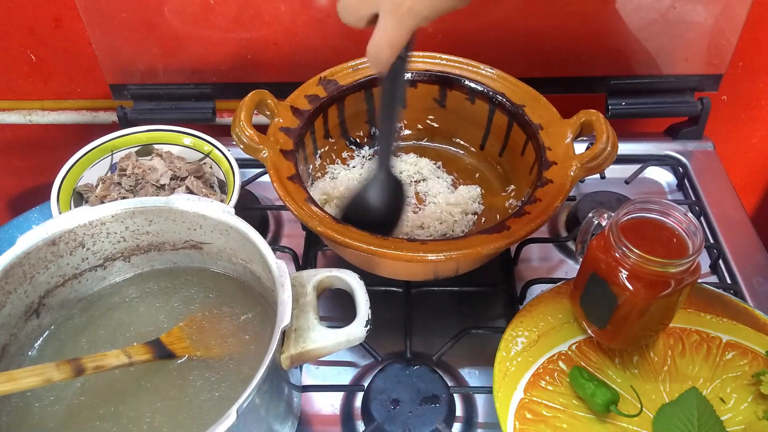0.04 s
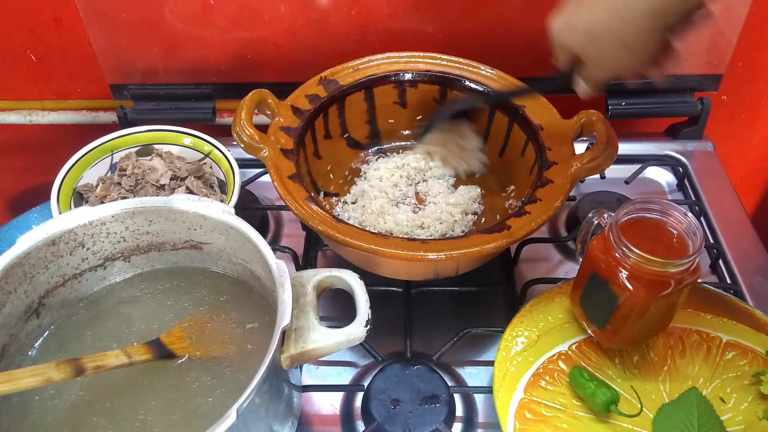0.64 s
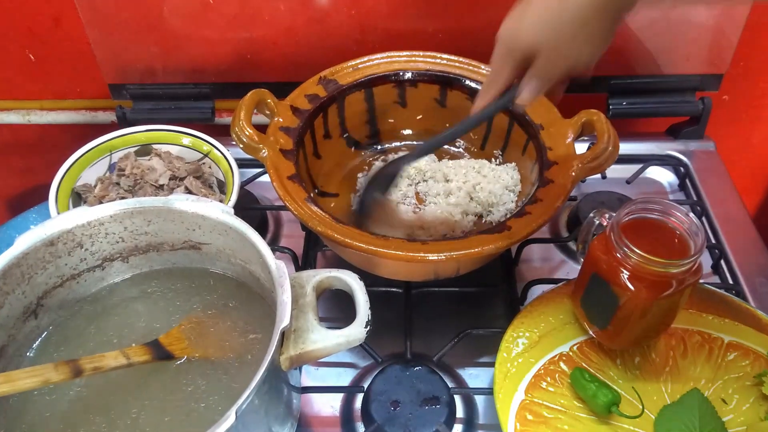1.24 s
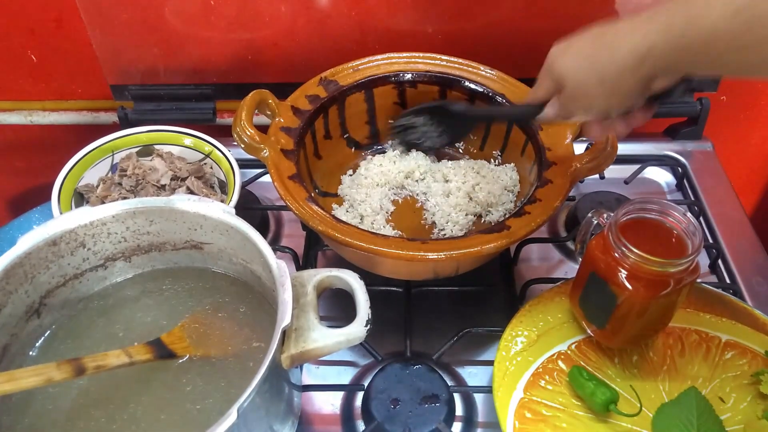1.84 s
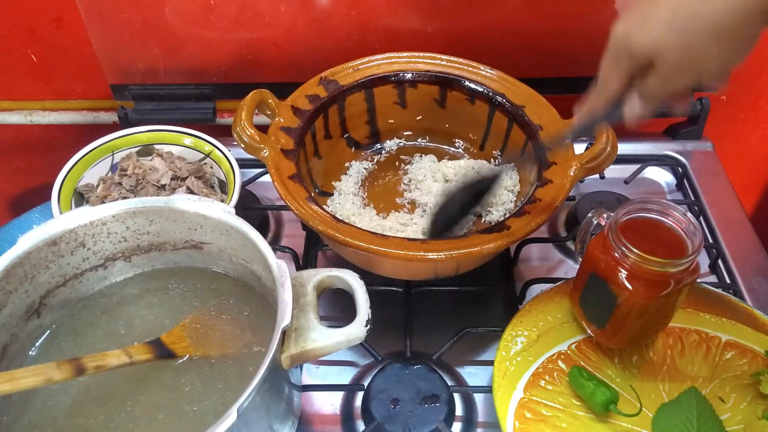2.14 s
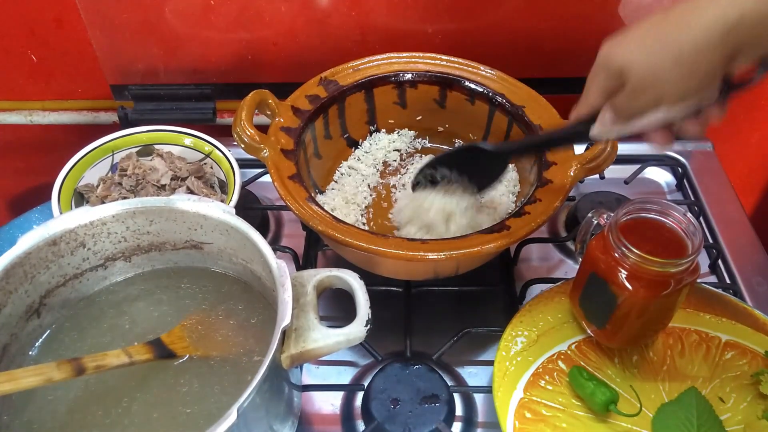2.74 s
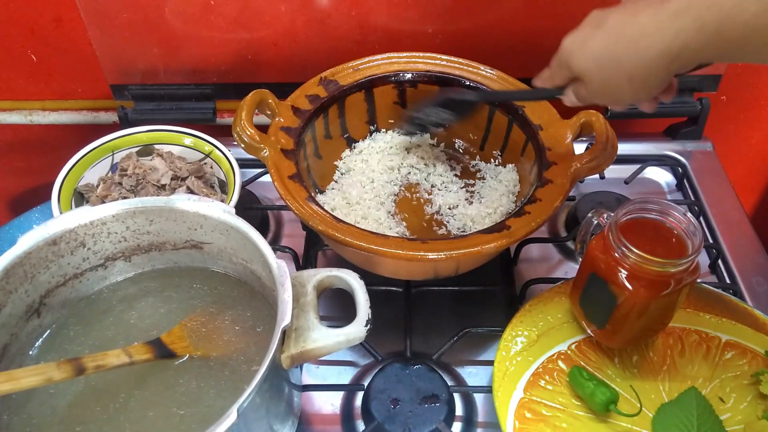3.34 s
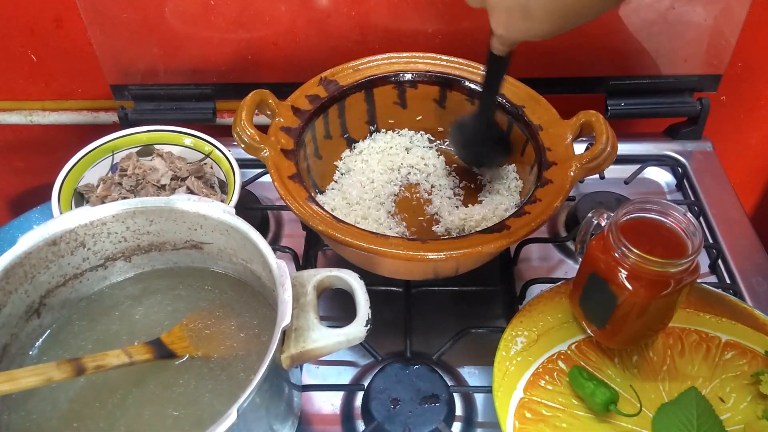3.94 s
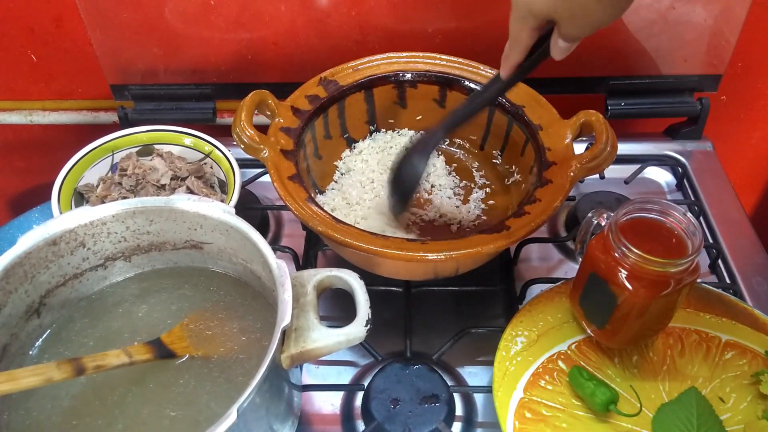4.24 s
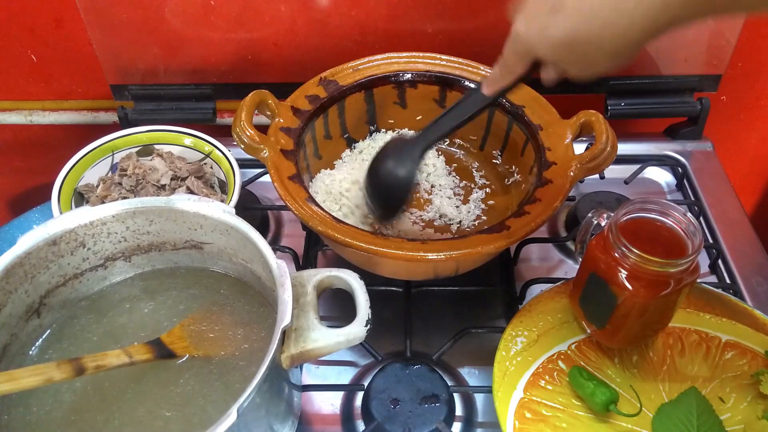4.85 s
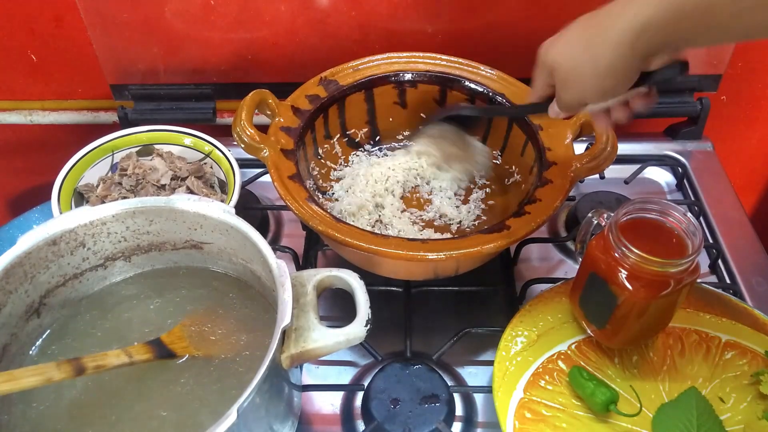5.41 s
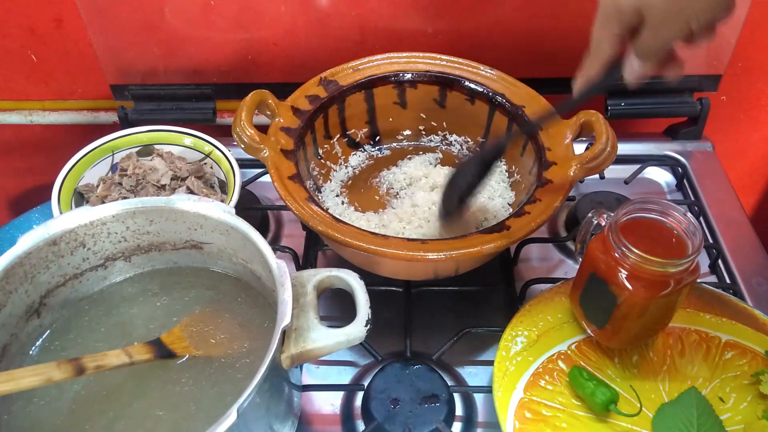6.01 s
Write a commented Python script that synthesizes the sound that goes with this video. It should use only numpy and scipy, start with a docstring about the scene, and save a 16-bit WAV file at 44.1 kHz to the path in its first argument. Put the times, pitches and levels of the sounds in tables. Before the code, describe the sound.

Gritty, irregular scraping runs throughout as dry rice is pushed around a clay pot with a plastic spoon. Dull bumps and sharper, briefly ringing knocks punctuate the hiss of sliding rice and the patter of flicked grains. A few faint squeaks come in the second half. A nearby microphone picks it up in a small kitchen, with a low background rumble and soft handling thumps, mostly at the start.

```python
"""A plastic spoon knocks and scrapes around a glazed clay pot, stirring dry rice in uneven strokes.
Hard knocks set the clay ringing and jolt the rice; where rice cushions the spoon, they are dull bumps.
Grains catch and slip under the spoon, the heap slides with a fine hiss, flicked grains patter on the
glaze and the dragged edge squeals faintly. A phone hears it through two close ports, with a short
kitchen echo, a low background rumble and a few handling thumps."""
import sys
import numpy as np
from scipy import signal
from scipy.fft import rfft, irfft
from scipy.io import wavfile
from scipy.ndimage import map_coordinates

SR = 44100
rng = np.random.default_rng(int(sys.argv[2]) if len(sys.argv) > 2 else 0)


def generate_wav(sig):
    """Save sig (samples, or channels by samples) to the path in sys.argv[1] as 16-bit PCM at SR."""
    pcm = np.round(np.clip(np.atleast_2d(sig).T, -1, 1) * 32767).astype(np.int16)
    wavfile.write(sys.argv[1], SR, pcm)


N = 267891
T = np.arange(N) / SR

# Tone of the kitchen background. Each row: frequency in Hz, gain in dB.
KITCHEN_EQ = [(25, -22.5), (50, -9), (80, 2), (130, 5), (250, 0.5), (600, -9.5), (1200, -30), (3000, -83),
              (15000, -51)]
# Fader ride of that background. Each row: time in seconds, level in dB.
KITCHEN_RIDE = [(0, -42), (0.85, -45), (0.98, -56), (1.4, -48.5), (1.85, -45.5), (2.25, -47), (2.65, -47),
                (3.0, -52.5), (3.6, -53.5), (4.3, -47.5), (4.7, -46), (5.55, -42.5), (5.66, -57.5),
                (6.07, -59.5)]
# Handling thumps. Each row: centre in seconds, relative level in dB.
THUMPS = [(0.038, -29), (0.091, -24.5), (0.163, -33.5), (0.25, -24.5), (0.293, -26.5), (0.358, -40),
          (0.433, -35), (0.478, -31.5), (0.508, -32), (0.687, -42), (0.807, -41), (2.677, -23.5),
          (4.909, -29.5), (4.946, -24), (5.091, -34), (5.179, -41)]
# Tone of the rumble around a thump. Each row: frequency in Hz, gain in dB.
RUMBLE_EQ = [(50, -31), (80, 6.5), (130, -6), (200, 7), (350, -10), (900, -53)]
# Squeals. Each row: start, crest and end in seconds, first and last pitch in Hz, level in dB.
SQUEALS = [(3.71, 3.81, 3.87, 1080, 1005, -54), (4.14, 4.28, 4.5, 1113, 1110, -45),
           (4.58, 4.73, 4.92, 1365, 1340, -44)]
# Single grains hitting the glaze. Each row: start in seconds, level in dB.
TICKS = [(1.424, -53), (1.6615, -40), (1.698, -47), (2.506, -45), (2.827, -46), (3.6448, -50), (3.702, -53)]
# Spurts of flicked rice. Each row: start in seconds, relative level in dB.
SPURTS = [(1.698, -34), (1.888, -21), (2.401, -19.5), (2.767, -34), (2.868, -33), (3.263, -39),
          (3.516, -30), (3.645, -39), (5.52, -29), (5.575, -27)]
# The spoon's edge catching on a grain. Each row: start in seconds, level in dB.
CATCHES = [(0.05, -38), (0.246, -39), (0.308, -38), (0.424, -33), (0.487, -33), (0.521, -33), (0.585, -34),
           (0.607, -33), (0.632, -34), (0.985, -44), (1.094, -44), (1.839, -39), (2.219, -33), (2.262, -37),
           (4.008, -35), (4.066, -36), (4.59, -40), (4.65, -39), (5.385, -42), (5.719, -44)]
# Tone of sliding rice. Each row: frequency in Hz, gain in dB.
SLIDE_EQ = [(3000, -8), (5500, 0), (7300, 4), (8300, 4.5), (10000, 4.5), (13000, 3.5), (15500, 0)]
# Tone of grains ground on clay. Each row: frequency in Hz, gain in dB.
GRIND_EQ = [(200, 3), (330, 5.5), (440, 8), (620, 4), (850, -1), (1300, 10.5), (1650, 10.5), (2350, 4.5),
            (3200, 9.5), (4150, 7.5), (5200, 4.5), (7300, 1), (10000, 4.5), (15000, -2)]
# Treble roll-off of the grinding. Each row: frequency in Hz, gain in dB.
GRIND_ROLLOFF = [(6500, -4.5), (9000, -14.5)]
# Stirring strokes. Each row: time of full push, rise and hold in seconds, then relative levels in dB
# of the four stirring layers: pot body, clatter, grinding, sliding rice.
STROKES = [(0.065, 0.12, 0.0078, -43.5, -36, -32, -44), (0.239, 0.1, 0.21, -41.5, -36.5, -35, -39.5),
           (0.515, 0.23, 0.14, -38.5, -32.5, -29.5, -39.5), (0.697, 0.11, 0.012, -32.5, -30, -31.5, -37.5),
           (1.096, 0.22, 0.15, -44, -46.5, -51, -51.5), (1.287, 0.111, 0.11, -52.5, -79, -58, -53),
           (1.498, 0.037, 0.08, -40, -43.5, -40, -41.5), (1.71, 0.016, 0.0088, -35, -44.5, -50, -53),
           (1.893, 0.052, 0.0047, -34, -32.5, -31.5, -34), (2.037, 0.067, 0.027, -56.5, -61, -48.5, -40.5),
           (2.205, 0.048, 0.11, -37, -35, -33.5, -37), (2.648, 0.05, 0.025, -44, -41.5, -37.5, -42),
           (2.854, 0.093, 0.0081, -64, -60.5, -52.5, -45.5), (3.05, 0.073, 0.099, -42, -44.5, -45.5, -46.5),
           (3.185, 0.081, 0.071, -47.5, -52.5, -63, -52), (3.504, 0.098, 0.0055, -38.5, -36, -36, -46),
           (3.673, 0.083, 0.11, -66, -68, -65, -61.5), (4.01, 0.076, 0.16, -41.5, -34.5, -30.5, -40),
           (4.217, 0.13, 0.24, -51.5, -58, -56, -68), (4.537, 0.098, 0.14, -35.5, -39.5, -35.5, -37),
           (4.768, 0.072, 0.14, -40.5, -50, -50.5, -53), (5.13, 0.2, 0.13, -42, -39, -35.5, -39.5),
           (5.297, 0.16, 0.18, -43, -41, -38, -39), (5.736, 0.094, 0.068, -44.5, -44, -44.5, -47),
           (5.938, 0.16, 0.15, -62.5, -68, -58.5, -50.5)]
# Release of those four layers after a stroke, in dB per second.
RELEASE_RATES = [132, 200, 178, 104]
# Jolt given to those four layers, in dB relative to a knock's body, clack, edge and snap.
JOLT_DB = [-3.5, 2, 0.5, -5]
# Resonances of pot and spoon. Each row: frequency in Hz, level on contact in dB, decay time
# multiplier, level in the free ring in dB.
MODES = [(296, -16, 1.3, -14), (562.5, 1.5, 2, -13.5), (628.5, 10, 0.51, -25), (683.7, 11.5, 0.6, -22),
         (728.7, 4, 1.73, -13.5), (785, 0, 1.07, -33), (953.3, 5.5, 1.4, 2.5), (1062, -2.5, 0.75, -30),
         (1226, 3.5, 1.1, -20), (1483, 0, 1.4, -3), (1538, -4, 1.6, -30), (1633, -1, 1.23, -4.5),
         (1850, -4.5, 1.5, -23), (2003, 9, 0.38, -16), (2520, 2, 0.4, -14), (2865, -8.5, 1, -13.5),
         (3200, -16, 1.0, -15), (4065, 4, 0.34, -11), (4520, -10, 0.5, -4)]
# Bands for thud, body, clack, edge and snap. Each row: low and high cutoff in Hz.
BANDS = [(255, 400), (490, 1050), (1050, 2300), (2300, 5200), (5200, 15500)]
THUD, BODY, CLACK, EDGE, SNAP = range(5)
# Cushioned bumps. Each row: start in seconds, most excited frequency in Hz, relative level in dB.
BUMPS = [(0.197, 750, -35.5), (0.433, 640, -28), (0.592, 537, -32), (0.708, 950, -32), (0.749, 652, -35.5),
         (1.109, 750, -35), (1.203, 659, -34.5), (1.32, 656, -39.5), (1.582, 650, -32.5), (1.654, 835, -35),
         (1.71, 668, -29.5), (1.784, 675, -32), (1.946, 687, -32), (2.132, 620, -39.5), (2.31, 660, -28.5),
         (2.51, 640, -33.5), (2.683, 614, -28.5), (3.056, 638, -34), (3.094, 612, -33.5),
         (3.162, 637, -36.5), (3.359, 640, -39.5), (3.482, 774, -29.5), (3.62, 623, -41.5),
         (4.065, 868, -31), (4.196, 620, -31.5), (5.098, 853, -32.5), (5.56, 591, -37.5), (5.92, 650, -44)]
# Hard knocks. Each row: start in seconds, most excited frequency in Hz, base decay time in seconds,
# levels of body, clack, edge, snap, hum and ping in dB, length of the free ring in seconds.
KNOCKS = [(0.419, 1780, 0.15, -39, -33, -31, -42, -52, -46, 0.02),
          (0.518, 1910, 0.2, -55, -43, -29, -40, -45, -44, 0.02),
          (0.898, 730, 0.081, -25.5, -38, -34, -33, -18.5, -29.5, 0.036),
          (1.476, 556, 0.15, -34, -40, -37, -59, -54, -46, 0.02),
          (1.846, 592, 0.23, -24.5, -33, -28, -52, -38, -34, 0.012),
          (2.203, 1350, 0.21, -37.5, -35, -60, -47, -60, -50, 0.02),
          (2.544, 617, 0.4, -31, -41, -33.5, -35, -41, -40, 0.025),
          (2.573, 673, 0.14, -25, -31, -31.5, -41, -31, -46, 0.017),
          (2.665, 566, 0.16, -35.5, -62, -28.5, -44, -56, -48, 0.0194),
          (2.9895, 1600, 0.076, -32, -20, -24.5, -44, -43, -26, 0.03),
          (3.392, 583, 0.48, -37.5, -37, -33, -44, -45, -37, 0.022),
          (3.8544, 1650, 0.11, -25.5, -21.5, -28.5, -44, -21, -41, 0.014),
          (4.133, 670, 0.12, -44, -41.5, -32, -54, -42, -48, 0.02),
          (4.458, 1016, 0.066, -22, -23.5, -45.5, -44.5, -24, -27, 0.021),
          (4.469, 634, 0.2, -23.5, -54, -41.5, -45, -36, -49, 0.02),
          (4.982, 680, 0.1, -20, -39, -28, -36.5, -22, -50, 0.026),
          (5.042, 734, 0.077, -43, -64, -30.5, -61, -50, -54, 0.02),
          (5.3969, 520, 0.048, -22, -31.5, -44, -59, -38, -34, 0.029),
          (5.5968, 680, 0.11, -27.5, -37, -32, -34, -27.5, -30, 0.041)]
# Weight of a knock's thud. Each row: most excited frequency in Hz, level against the body in dB.
THUD_WEIGHT = [(500, -2.5), (600, -9), (700, -30.5), (1000, -19), (1600, -28)]
# Tone of a knock's snap. Each row: frequency in Hz, gain in dB.
SNAP_EQ = [(5200, 3), (8500, 1.5), (12000, 0), (15000, 0)]
# Stereo width of the ports. Each row: frequency in Hz, side over mid in dB.
PORT_WIDTH = [(100, -5), (170, -5), (300, -12), (600, -14), (900, -2), (1300, 4), (2000, -1), (4000, -1),
              (8000, 0)]
# Balance of the ports. Each row: frequency in Hz, left over right in dB.
PORT_BALANCE = [(100, -6.5), (300, -2.5), (1500, -2.5), (2500, 0), (3200, 0.5), (4200, -1.5), (8000, -2),
                (14000, -3.5)]
# Phase lead of the left port. Each row: frequency in Hz, lead in radians.
PORT_LEAD = [(150, 0), (350, .35), (700, .3), (1100, 0)]


def undb(db):
    """Decibels to gain."""
    return 10 ** (np.asarray(db) / 20)


def unit(x):
    """Scale to rms 1."""
    return x / np.sqrt(np.mean(x ** 2) + 1e-20)


def at_hz(points, hz):
    """Read (Hz, value) points on a log-frequency axis."""
    f, value = np.transpose(points)
    return np.interp(np.log(hz + 1), np.log(f), value)


def eq(x, curve):
    """Shape x with a curve of (Hz, dB) points."""
    size = x.shape[-1]
    gain = undb(at_hz(curve, np.fft.rfftfreq(2 * size, 1 / SR)))
    return irfft(rfft(x, 2 * size) * gain)[..., :size]


def band(x, index):
    """Band-pass x to one of the five bands."""
    return signal.sosfilt(signal.butter(4, BANDS[index], "band", fs=SR, output="sos"), x)


def hit_band(x, index, db):
    """One band of a hit, set to db over its first 30 ms."""
    x = band(x, index)
    return x * undb(db) / np.sqrt(np.mean(x[:, :SR * 3 // 100] ** 2, axis=1, keepdims=True))


def fade(t, t60):
    """Exponential decay, 60 dB down after t60 seconds."""
    return np.exp(-np.log(1000) * t / max(t60, 1e-3))


def attack(rise_s, size):
    """A rounded onset."""
    return 1 - np.exp(-T[:size] / rise_s)


def burst(t60, size):
    """Two unrelated decaying noises, for mid and side."""
    return rng.standard_normal((2, size)) * fade(T[:size], t60)


def ring(hz, t60, size):
    """One decaying resonance, with mid and side a quarter cycle apart."""
    phase = 2 * np.pi * hz * T[:size] + np.array([[0], [np.pi / 2]])
    return np.sin(phase) * fade(T[:size], t60) * attack(0.00008, size)


def convolve(x, response):
    """Play x through an impulse response."""
    return signal.fftconvolve(np.atleast_2d(x), response, axes=1)[:, :N]


def add(out, s, x):
    """Mix x in at s seconds."""
    i = int(s * SR)
    x = x[..., max(-i, 0):N - i]
    out[:, max(i, 0):max(i, 0) + x.shape[-1]] += x


def walk(rate):
    """Random wander at rms 1, with rate new targets a second."""
    points = rng.standard_normal(int(N / SR * rate) + 2)
    return unit(np.interp(T * rate, np.arange(len(points)), points))


def grains(rate, spread_db):
    """Random tiny impacts: many weak ones, a few strong."""
    hits = rng.random(N) < rate / SR
    strength = np.minimum(rng.exponential(size=N), 4)
    return hits * undb(spread_db * strength) * rng.choice([-1, 1], N)


def room(x, wet_db, t60=0.41, size=22050):
    """A small hard kitchen: the echo builds up within milliseconds and dies quickly."""
    build_up = 1 - np.exp(-(T[:size] / 0.01) ** 2)
    tail = eq(burst(t60, size) * build_up, [(150, 1.6), (600, -0.95), (4000, 0.71), (14000, 0.79)])
    return x + undb(wet_db) * convolve(x, unit(tail) / np.sqrt(size))


def phone_ports(mid_side, lag_s=1 / 2480):
    """Two spaced ports give left and right; mid and side take turns along the spectrum."""
    hz = np.fft.rfftfreq(N, 1 / SR)
    comb = np.exp(-(hz / 13000) ** 3) * (.04 + .955 * np.cos(2 * np.pi * hz * lag_s))
    side_ratio = (1 + comb) / (1 - comb) * undb(at_hz(PORT_WIDTH, hz)) ** 2
    power_share = np.array([np.ones_like(hz), side_ratio]) / (1 + side_ratio)
    mid, side = rfft(mid_side) * np.sqrt(power_share)
    lean = undb(at_hz(PORT_BALANCE, hz) / 2) * np.exp(1j * at_hz(PORT_LEAD, hz) / 2)
    return irfft(np.array([(mid + side) * lean, (mid - side) / lean]), N)


def kitchen_tone():
    """A low, fluttering bed of rumble."""
    rumble = unit(eq(rng.standard_normal((2, N)), KITCHEN_EQ))
    return rumble * undb(np.interp(T, *np.transpose(KITCHEN_RIDE)) + 2 * walk(27))


def handling(thump_hz=124, width_s=0.0037, rumble_s=0.014, size=8820):
    """Dull thumps of a cycle or two in a loose rumble; they push the two ports in opposite senses."""
    out = np.zeros((2, N))
    t = T[:size] - T[size // 2]
    for s, db in THUMPS:
        rumble = unit(eq(rng.standard_normal(size), RUMBLE_EQ)) * np.exp(-np.abs(t) / rumble_s)
        phase = 2 * np.pi * thump_hz * t + rng.uniform(0, 2 * np.pi)
        thump = np.cos(phase) * np.exp(-np.abs(t / width_s) ** 1.4)
        add(out[1:], s + t[0], undb(db) * (thump + undb(-10.5) * rumble))  # side only
    return undb(16) * signal.sosfilt(signal.butter(6, 62, "high", fs=SR, output="sos"), out)


def squeals(fade_s=0.026):
    """The dragged spoon's edge sticks and slips fast enough to sing a faint, unsteady tone."""
    out = np.zeros((2, N))
    for start, crest, end, first_hz, last_hz, db in SQUEALS:
        glide = np.interp(T, [start, end], [first_hz, last_hz])
        hz = glide * (1 + 0.00408 * walk(40) + 0.01 * walk(400))
        arch_db = np.interp(T, [start, crest, end], [-8, 0, -8])
        gate = np.clip(np.minimum(T - start, end - T) / fade_s, 0, 1)
        swell = gate * undb(db + arch_db + 2.7 * walk(27.4) + 1.5 * walk(160))
        out[0] += np.sqrt(2) * swell * np.sin(2 * np.pi * np.cumsum(hz) / SR)
    return out


def grain_ticks(skitter_db=-11, size=4096):
    """A grain hits the glaze with a bright click and skitters on in a short rustle."""
    out = np.zeros((2, N))
    for s, db in TICKS:
        contact = burst(0.009, size) + undb(skitter_db) * burst(0.09, size)
        add(out, s, hit_band(eq(contact, SLIDE_EQ), SNAP, db))
    return out


def rice_spurts(click_db=-11, shower_db=-7.5, size=8192):
    """Flicked rice lands: a first grain clicks on the glaze and a shower follows."""
    out = np.zeros((2, N))
    for s, db in SPURTS:
        patter = unit(grains(rate=21000, spread_db=2.5)[:size])
        shower = undb(shower_db) * patter * burst(0.19, size) * attack(0.0039, size)
        click = undb(click_db) * burst(0.011, size)
        add(out, s, undb(db) * eq(click + shower, SLIDE_EQ))
    return out


def grain_catches(top_db=-9):
    """A grain caught under the spoon's edge slips free in a short rasp."""
    out = np.zeros((2, N))
    for s, db in CATCHES:
        rasp = eq(burst(t60=0.11, size=6144), GRIND_EQ)
        add(out, s, hit_band(rasp, EDGE, db) + hit_band(rasp, SNAP, db + top_db))
    return out


def pot(focus_hz, focus_db, t60, dense_db, crack_db, size=8192):
    """The pot's answer to a contact: modes favoured by the spot, a wash of dense modes, a crack."""
    modes = 0
    for hz, db, sustain, _ in MODES:
        nearness = np.exp(-(np.log(hz / focus_hz) / 0.11) ** 2)
        modes = modes + undb(db + focus_db * nearness) * ring(hz, t60 * sustain, size)
    contact = undb(dense_db) * burst(t60, size) + undb(crack_db) * burst(0.014, size)
    return modes + eq(contact, GRIND_EQ)


def spoon_drift(x, depth=0.035):
    """The spoon's resonances waver as its pressure and point of contact change."""
    playhead = np.cumsum(1 + depth * walk(30))
    return np.array([map_coordinates(channel, [playhead], mode="mirror") for channel in x])


def far_wall(x, lag_s=0.000928, travel_s=0.000262, echo_db=-5):
    """The pot's opposite wall adds a close echo that moves with the spoon, like a light flange."""
    when = T - lag_s - travel_s * walk(5)
    return x + undb(echo_db) * np.array([np.interp(when, T, channel) for channel in x])


def clumps(per_s=80, t60=0.11, depth=0.09, size=4096):
    """Gain of the rubbing as clumps of rice break loose: each swells quickly and runs out."""
    swish = fade(T[:size], t60) * attack(0.002, size)
    breaks = 1. * (rng.random(N) < per_s / SR)
    flow = convolve(breaks, swish[None])[0]
    return 1 + depth * unit(flow - flow.mean())


def crackle(slips, decay_s=0.0005, rub=0.9):
    """Each slipping grain gives a tiny burst over the steady rub of the rest."""
    bursts = convolve(np.abs(slips), np.exp(-T[:256] / decay_s)[None])
    return rng.standard_normal((2, N)) * (unit(bursts) + rub)


def stir_envelopes(rise_db=19.5, jolt_rise_s=0.0059, jolt_fall_db_per_s=283):
    """Gains of the four stirring layers: strokes build, hold and release; knocks jolt the rice."""
    gains = np.zeros((4, N))
    for s, rise_s, hold_s, *levels in STROKES:
        build_db = rise_db * np.maximum(s - T, 0) / rise_s
        release_db = np.outer(RELEASE_RATES, np.maximum(T - s - hold_s, 0))
        gains = np.maximum(gains, undb(levels)[:, None] * undb(-build_db - release_db))
    for s, _, _, *levels, _, _, _ in KNOCKS:
        onset = np.clip((T - s) / jolt_rise_s, 0, 1)
        jolt = onset * undb(-jolt_fall_db_per_s * np.maximum(T - s - jolt_rise_s, 0))
        gains = np.maximum(gains, np.outer(undb(JOLT_DB) * undb(levels), jolt))
    return gains


def stirring(surge_db=1.2, chatter_db=1.5):
    """Grains catch and slip under the spoon and rattle the pot; the pushed heap slides and hisses."""
    body, clatter, grind, slide = stir_envelopes()
    surge = undb(surge_db * walk(45)) * clumps()  # the heap gives way in small surges
    slips = grains(rate=1500, spread_db=2.5) * undb(2 * walk(70))
    # the pressed spoon damps the wall, so these rings are short
    hollow = convolve(slips, pot(596, focus_db=22, t60=0.051, dense_db=32.5, crack_db=3))
    rattle = spoon_drift(convolve(slips, pot(1300, focus_db=4, t60=0.022, dense_db=12, crack_db=2)))
    crunch = eq(crackle(slips), GRIND_EQ)
    scrape = far_wall(unit(rattle) + undb(6) * unit(crunch)) * surge
    hiss = unit(eq(rng.standard_normal((2, N)), SLIDE_EQ)) * surge * undb(0.39 * walk(120))
    chatter = undb(chatter_db * walk(220))
    return (undb(-7.5) * body * unit(band(scrape, THUD))
            + undb(-0.5) * body * unit(band(scrape, BODY))
            + undb(-1.5) * body * unit(band(hollow, BODY))
            + undb(-1.76) * clatter * unit(band(scrape, CLACK) * chatter)
            + undb(-1.34) * grind * unit(band(scrape, EDGE))
            + undb(-14) * grind * unit(eq(band(scrape, SNAP), GRIND_ROLLOFF))
            + undb(-0.13) * slide * hiss)


def spoon_bumps(trim_db=-2):
    """Rice cushions the spoon against the wall, so these hits have a soft attack and stay dull."""
    out = np.zeros((2, N))
    for s, hz, db in BUMPS:
        bump = pot(hz, focus_db=34.5, t60=0.079, dense_db=27, crack_db=-15)
        bump *= attack(0.0018, bump.shape[1])
        for index, share_db in ((THUD, -18), (BODY, 0), (CLACK, -19.5)):
            add(out, s, hit_band(bump, index, db + share_db + trim_db))
    return out


def wall_rings(free_t60=0.3, pressed_t60=0.078, hum_top_hz=1100, size=8192):
    """The spoon rebounds and the clay rings, a low hum and a high ping, until the spoon damps it."""
    out = np.zeros((2, N))
    for s, *_, hum_db, ping_db, free_s in KNOCKS:
        damping = fade(np.maximum(T[:size] - free_s, 0), pressed_t60)
        for hz, _, sustain, db in MODES:
            gain = undb(db + (hum_db if hz < hum_top_hz else ping_db))
            add(out, s, gain * ring(hz, free_t60 * sustain, size) * damping)
    return out


def spoon_knocks(push_db=22, push_cycles=10.7, size=8192):
    """The spoon hits the wall: one hard push, a short snap on top, and clay ringing on below."""
    out = np.zeros((2, N))
    for s, hz, t60, body_db, clack_db, edge_db, snap_db, *_ in KNOCKS:
        knock = pot(hz, focus_db=12, t60=t60, dense_db=-2, crack_db=12, size=size)
        knock += undb(push_db) * ring(hz, push_cycles / hz, size)
        thud_db = body_db + at_hz(THUD_WEIGHT, hz)
        layers = (THUD, thud_db, 0.59), (BODY, body_db, 1), (CLACK, clack_db, 0.35), (EDGE, edge_db, 0.73)
        for index, db, damping_t60 in layers:
            add(out, s, hit_band(knock * fade(T[:size], damping_t60), index, db))
        snap = eq(knock + undb(27) * burst(0.0029, size), SNAP_EQ)
        tilt = [(6000, 0), (14000, 0.35 * (snap_db + 33))]  # harder snaps are brighter
        add(out, s, hit_band(eq(snap, tilt), SNAP, snap_db))
    return out


def scene():
    """Mix background, clay and rice as mid and side, then hear them through the phone's ports."""
    background = kitchen_tone()
    clay = room(spoon_knocks() + spoon_bumps(), wet_db=-8) + room(wall_rings(), wet_db=-13.5)
    rice = room(stirring() + grain_catches() + grain_ticks() + rice_spurts(), wet_db=-9.5)
    return phone_ports(clay + rice + squeals() + handling() + background)


def record(dry, drive=0.7, top_hz=15600):
    """The phone rounds the loudest peaks and cuts the top."""
    rounded = np.tanh(drive * dry) / drive
    return signal.sosfilt(signal.ellip(10, .2, 80, top_hz, fs=SR, output="sos"), rounded)


dry = scene()
out = record(dry)
generate_wav(out)
```